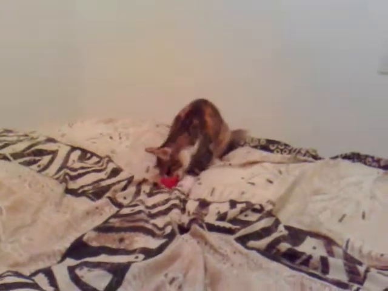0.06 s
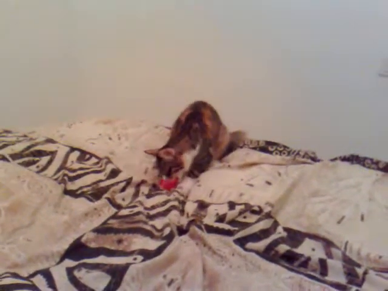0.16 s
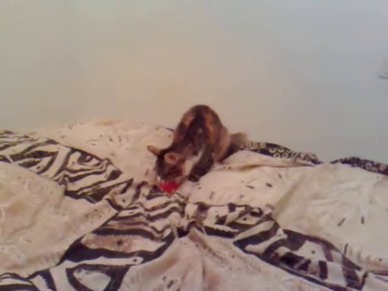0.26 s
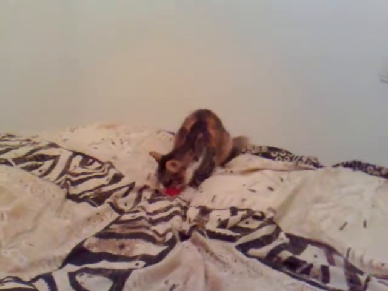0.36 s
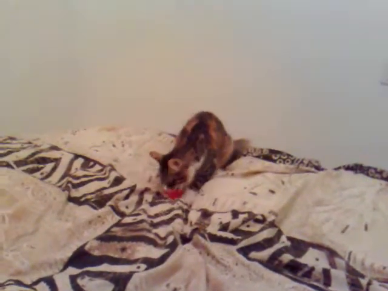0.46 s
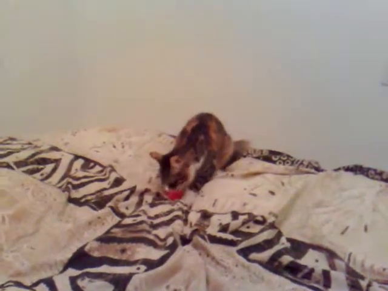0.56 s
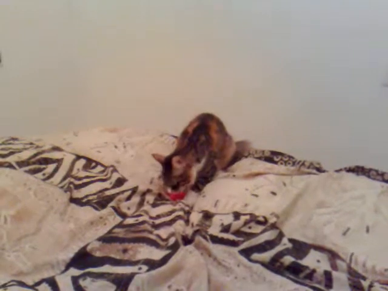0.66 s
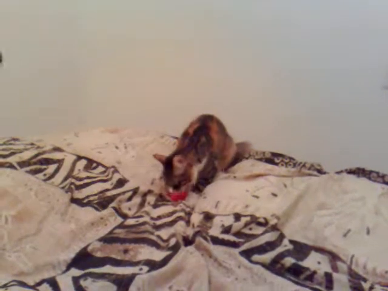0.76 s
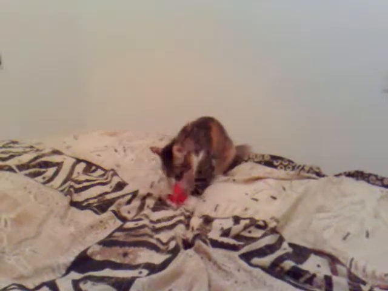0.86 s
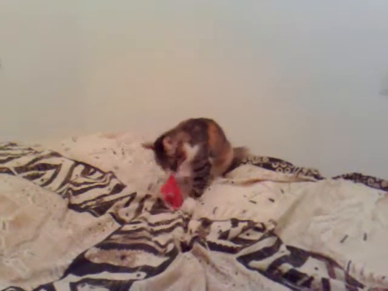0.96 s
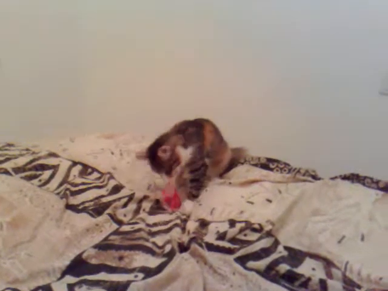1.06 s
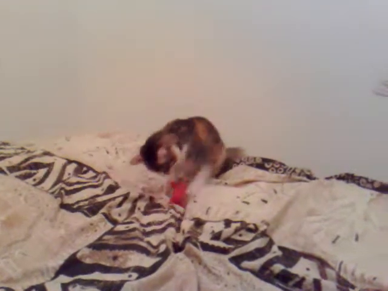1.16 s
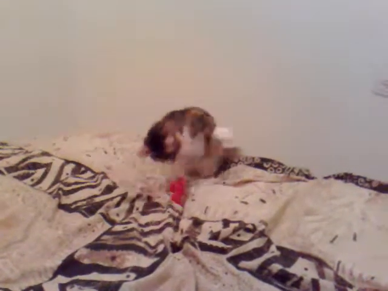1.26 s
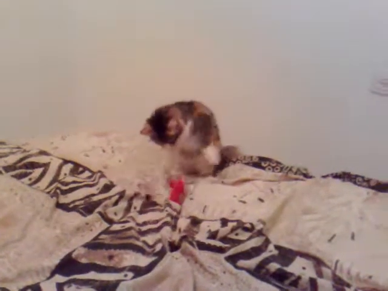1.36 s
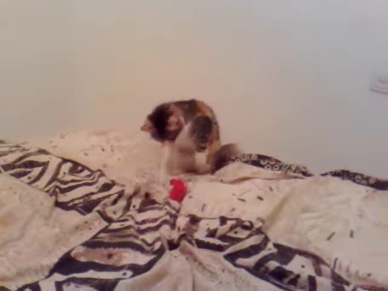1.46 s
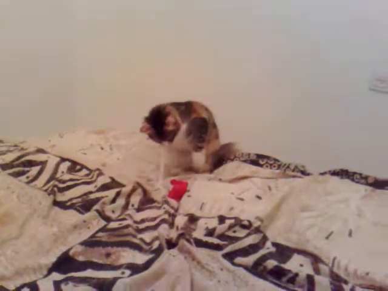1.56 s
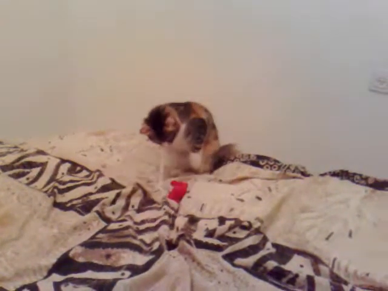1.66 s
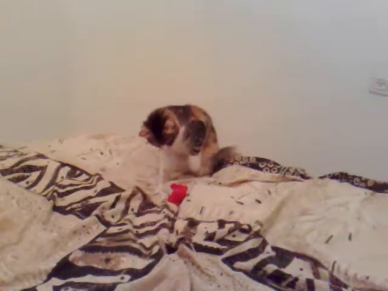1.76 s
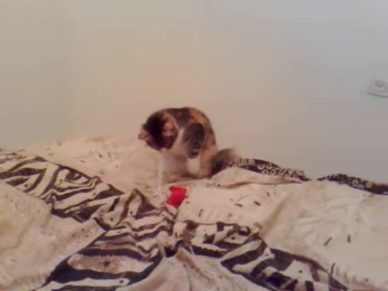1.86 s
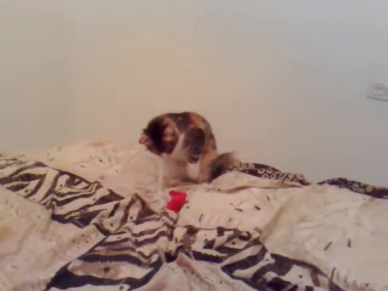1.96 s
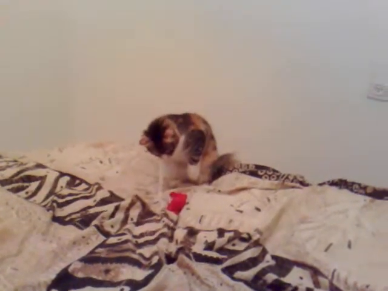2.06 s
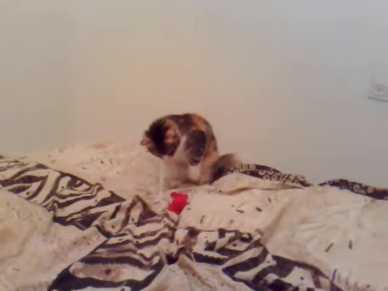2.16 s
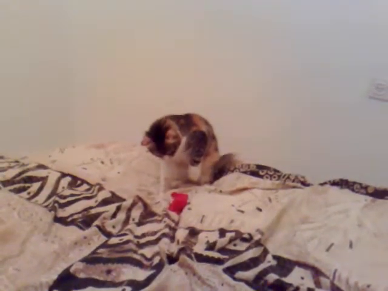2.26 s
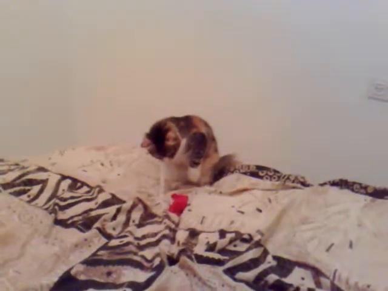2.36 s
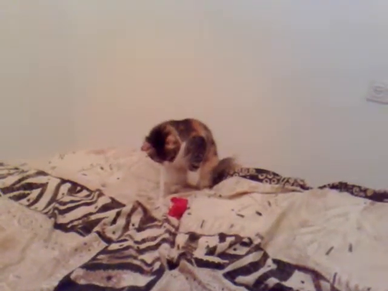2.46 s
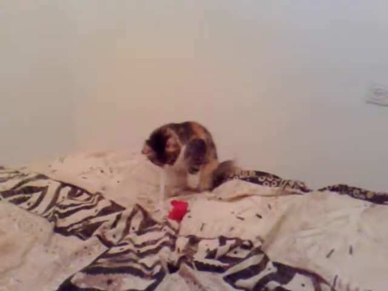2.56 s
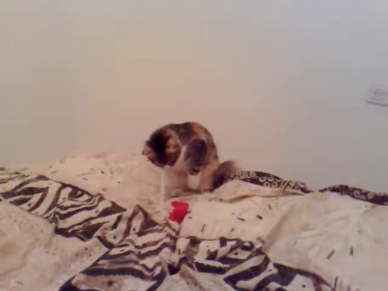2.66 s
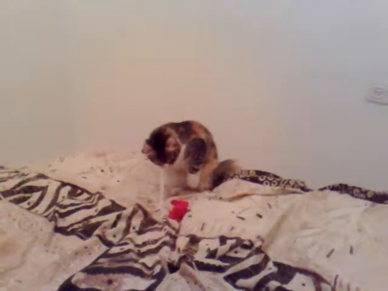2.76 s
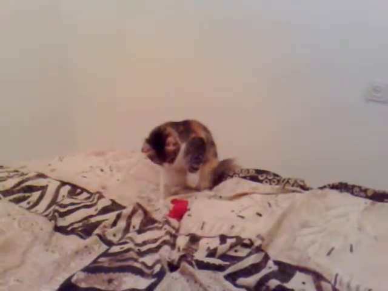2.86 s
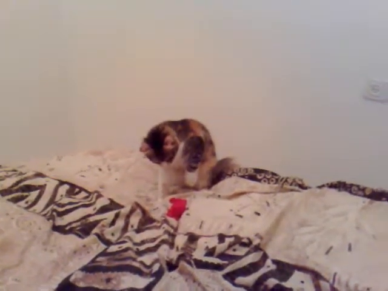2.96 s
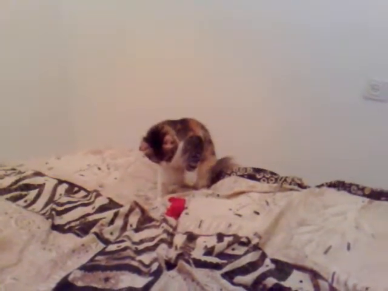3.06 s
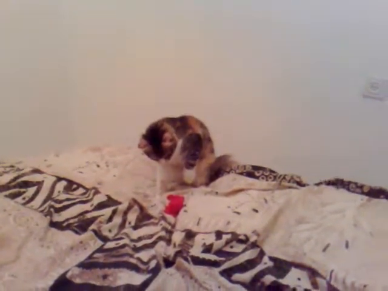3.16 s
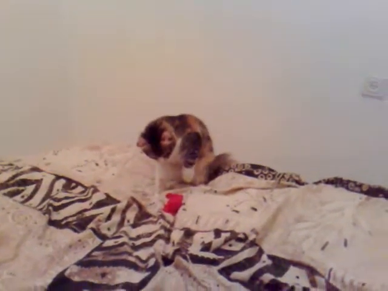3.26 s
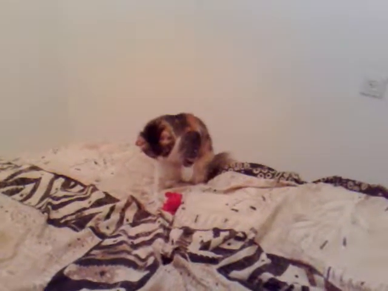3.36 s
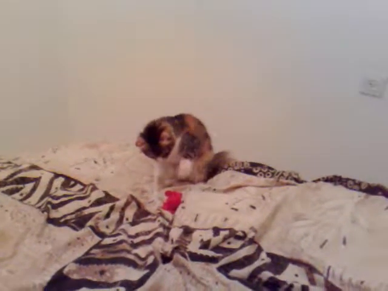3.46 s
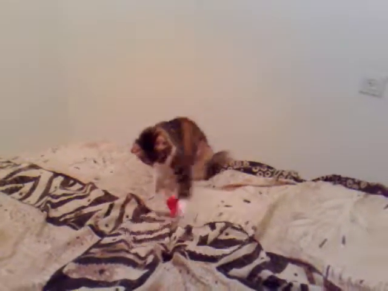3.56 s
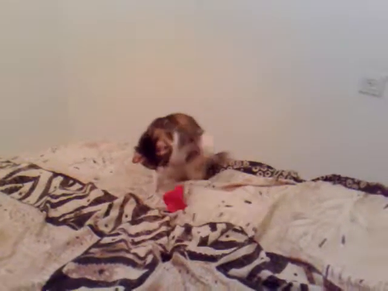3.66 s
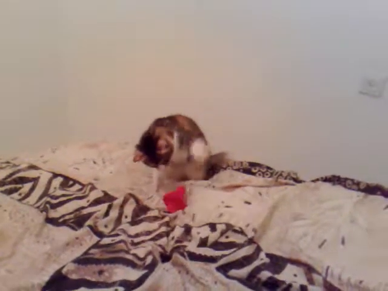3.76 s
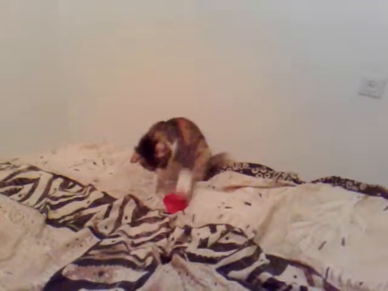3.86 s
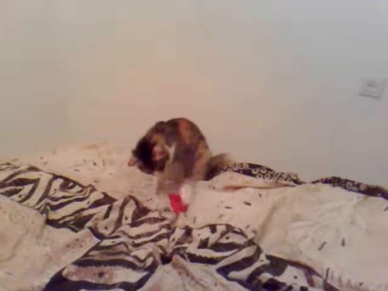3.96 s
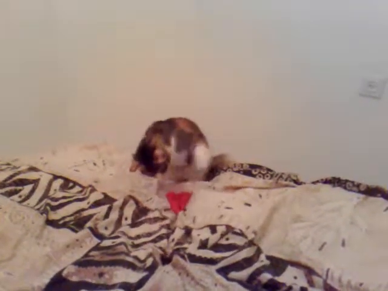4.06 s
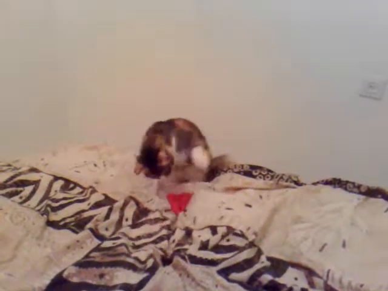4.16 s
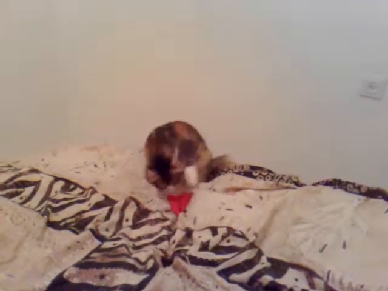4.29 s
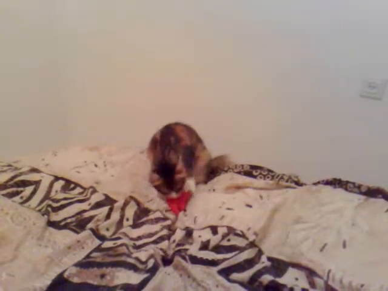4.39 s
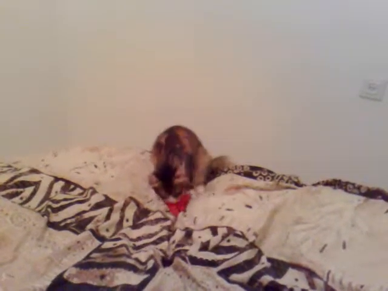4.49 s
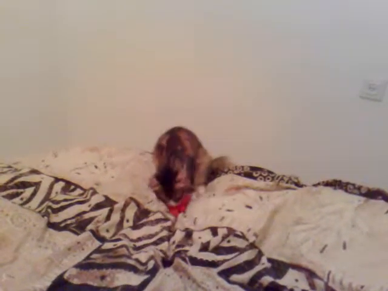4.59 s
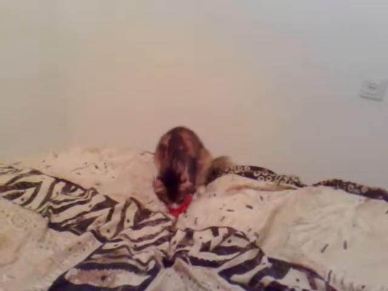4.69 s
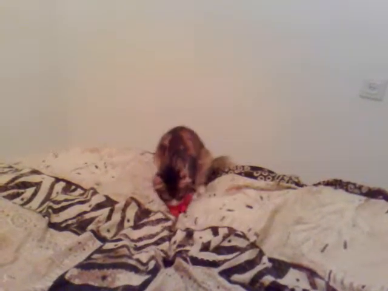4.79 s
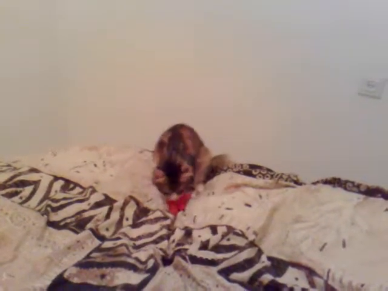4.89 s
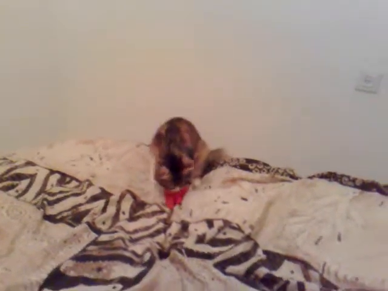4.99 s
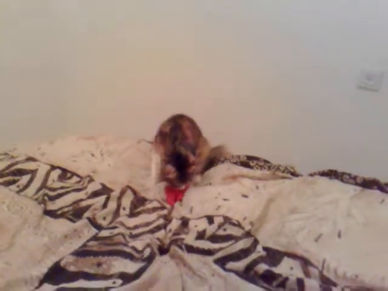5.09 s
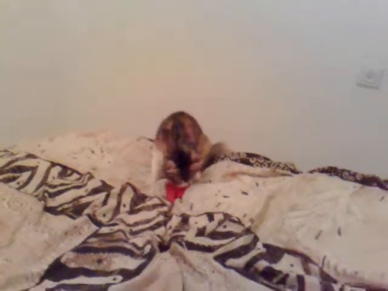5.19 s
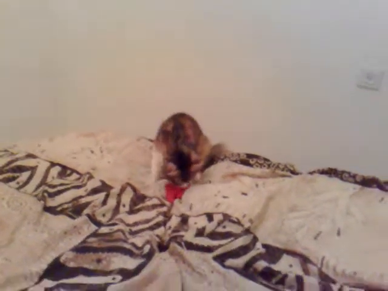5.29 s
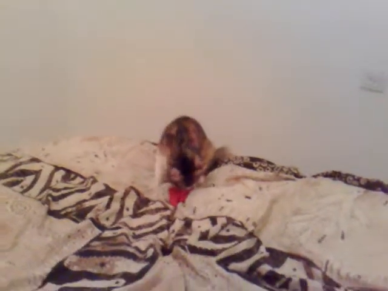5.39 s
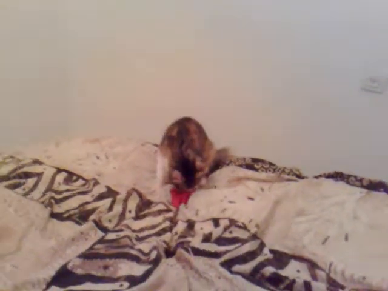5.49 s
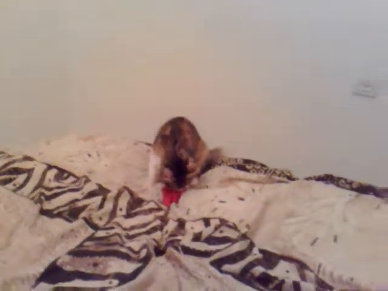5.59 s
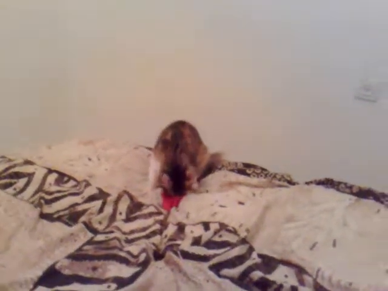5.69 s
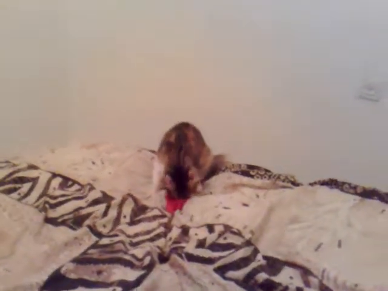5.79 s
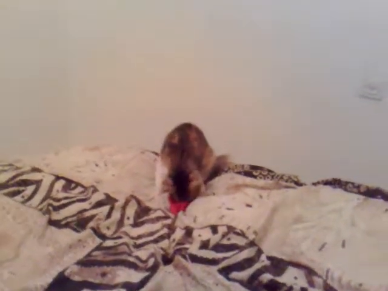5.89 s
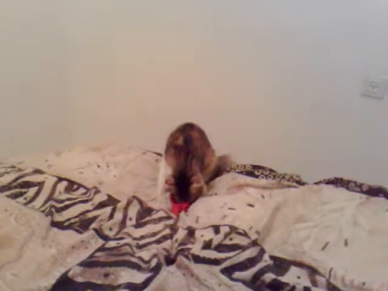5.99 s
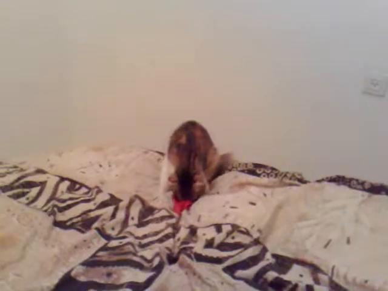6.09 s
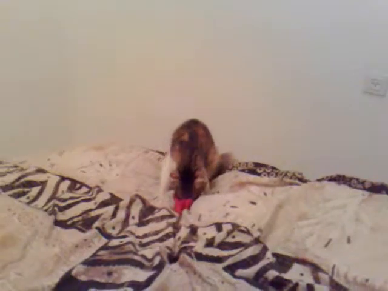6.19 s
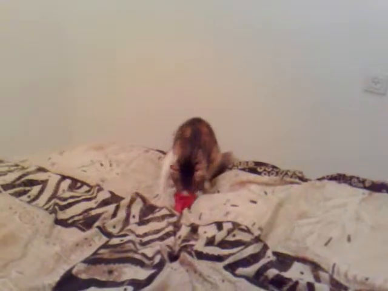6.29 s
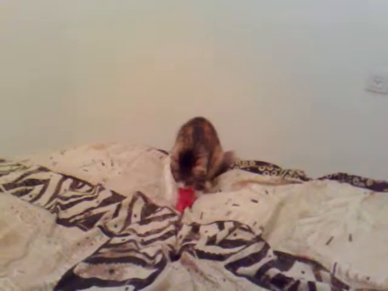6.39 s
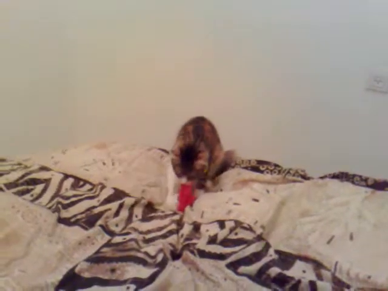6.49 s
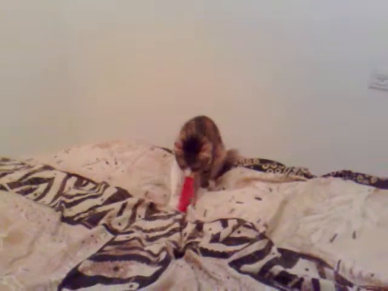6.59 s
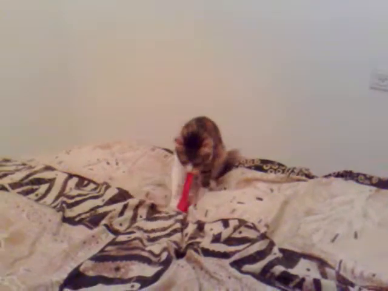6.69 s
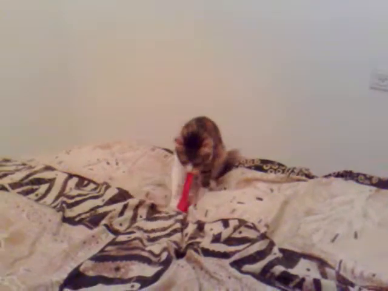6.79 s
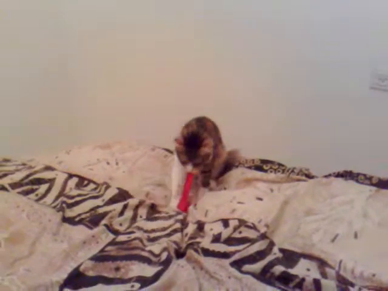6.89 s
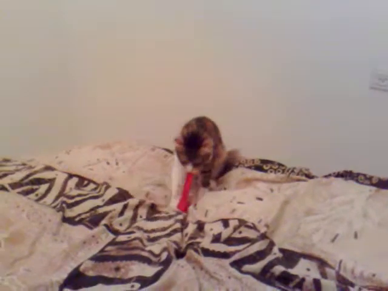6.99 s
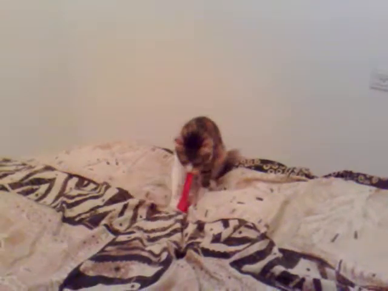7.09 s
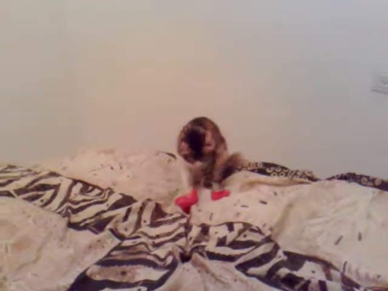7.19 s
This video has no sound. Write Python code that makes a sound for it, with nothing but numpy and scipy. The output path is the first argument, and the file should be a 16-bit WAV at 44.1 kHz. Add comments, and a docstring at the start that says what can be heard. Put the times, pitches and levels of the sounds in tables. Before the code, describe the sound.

Quiet small room with faint cloth rustle, a stretched-rubber snap, dull swats, and finally hard dry clicks as a cat bites a deflated balloon.

```python
"""In a small bare-walled room, a cat plays with a limp rubber balloon on a bedspread.
Stretched rubber snaps back and soft paws swat it: noise cracks, each followed by a decaying room tail.
Sharp, almost dry clicks of teeth and claws are short damped tones with a noise crack.
Bedding rustles as uneven filtered noise, over steady rumble, microphone hiss and a faint high whine."""
import sys
import numpy as np
from scipy import signal
from scipy.fft import rfft, irfft
from scipy.io import wavfile
from scipy.ndimage import uniform_filter1d

SR = 44100
rng = np.random.default_rng(int(sys.argv[2]) if len(sys.argv) > 2 else 0)


def bounce(signal):
    """Save signal as a 16-bit WAV file at the path given by the first command-line argument."""
    frames = np.transpose(np.atleast_2d(signal))
    limited = np.clip(frames, -1, 1)
    pcm = np.round(limited * 32767).astype(np.int16)
    wavfile.write(sys.argv[1], SR, pcm)


N = 319504


def from_db(db):
    """Turn decibels into a plain multiplier."""
    return 10 ** (np.asarray(db) / 20)


def rms_one(x):
    """Scale a signal to an average strength (rms) of 1."""
    return x / np.sqrt(np.mean(x ** 2) + 1e-20)


def at_hz(points, hz):
    """Read a table of levels between its points, on a log-frequency axis."""
    table_hz, table_db = np.array(points)[:, 0], np.array(points)[:, 1]
    return np.interp(np.log(hz), np.log(table_hz), table_db)


def bins(size):
    """Frequencies of a spectrum, kept above zero."""
    return np.maximum(np.fft.rfftfreq(size, 1 / SR), 1)


def noise(shape_db, size):
    """Noise of rms 1, coloured by a relative level at each frequency."""
    white = rfft(rng.standard_normal(size))
    return rms_one(irfft(white * from_db(shape_db), size))


def uneven(db, width, size):
    """A gain that wanders at random by this many dB (rms), smoothed over a width in samples."""
    wander = uniform_filter1d(rng.standard_normal(size), width)
    return from_db(db * rms_one(wander))


def fade(t, t60):
    """Exponential decay that falls by 60 dB in t60 seconds."""
    return np.exp(-np.log(1000) * t / t60)


def add(out, s, sound):
    """Mix a sound in at a time in seconds."""
    start = int(round(s * SR))
    out[start:start + len(sound)] += sound[:max(N - start, 0)]


def burst(shape_db, t60):
    """A brief noise crack, with its random energy evened so that equal settings are equally strong."""
    t = np.arange(SR) / SR
    envelope = fade(t, t60) * (1 - fade(t, t60 / 10))
    grain = noise(shape_db, SR) * envelope
    return 0.5 * grain * np.sqrt(np.sum(envelope ** 2) / np.sum(grain ** 2))


def sweep(x, lag_s):
    """Bending waves run slower at low pitch, so a crack becomes a quick downward chirp."""
    hz = bins(len(x))
    # lag_s sets the delay at 1 kHz; the highest frequency is not delayed
    delay_s = lag_s * (np.sqrt(1000 / hz) - np.sqrt(1000 / hz[-1]))
    phase = 2 * np.pi * np.cumsum(delay_s) * SR / len(x)
    return irfft(rfft(x) * np.exp(-1j * phase), len(x))


# how the room's echo dies away: (frequency [Hz], time to fall 60 dB [s])
ROOM_DECAY = [(100, 0.59), (300, 0.39), (700, 0.31), (2000, 0.41), (4400, 0.32), (6000, 0.26), (8000, 0.22),
              (15000, 0.22)]


def room_tail(shape_db):
    """One second of dense wall reflections; each pitch region dies at its own speed."""
    t, hz = np.arange(SR) / SR, bins(SR)
    spectrum, out = rfft(noise(shape_db, SR)), 0
    centres, t60s = np.transpose(ROOM_DECAY)
    for picked, t60 in zip(np.eye(len(ROOM_DECAY)), t60s):
        share = np.interp(np.log(hz), np.log(centres), picked)   # overlapping bands that add up to one
        out = out + irfft(spectrum * share, SR) * fade(t, t60)
    return out


# colour of the steady rumble and hiss: (frequency [Hz], relative level per Hz [dB])
RUMBLE_AND_HISS = [(12, -47.5), (20, -6.5), (26, -9.5), (53, 0), (101, -1.5), (270, -7.5), (485, -12.5),
                   (590, -14.5), (678, -16.5), (1570, -23), (2320, -24.5), (6720, -29.5), (11100, -28.5),
                   (12400, -25), (16000, -27.5)]
FLOOR_DB, WHINE_DB = -62, -79.5   # rms levels
WHINE_HZ, WHINE_HALF_WIDTH_HZ = 12560, 140


def background():
    """Room rumble and microphone hiss are coloured noise; an electronic whine is a narrow noise band."""
    hz = bins(N)
    whine = noise(-20 * np.log10(1 + ((hz - WHINE_HZ) / WHINE_HALF_WIDTH_HZ) ** 2), N)
    rumble_and_hiss = noise(at_hz(RUMBLE_AND_HISS, hz), N)
    return from_db(FLOOR_DB) * rumble_and_hiss + from_db(WHINE_DB) * whine


# bedding shifts, each swelling and fading: (time [s], level [dB], half length [s])
RUSTLES = [(0.253, -66.5, 0.023), (.6, -73, 0.24), (1.073, -70, 0.061), (1.736, -65.5, 0.1),
           (4.715, -63, 0.035), (5.502, -71, 0.22), (6.706, -56, 0.025), (6.78, -57.5, 0.067)]
# colour of rubbing cloth: (frequency [Hz], relative level per Hz [dB])
CLOTH = [(100, 6), (400, -1.5), (1500, -8), (3500, -13.5), (8000, -27.5), (16000, -26)]


def bedding(grain_db=2.5, grain_s=0.0048):
    """Cloth drags in small uneven catches as the cat shifts its weight."""
    t = np.arange(N) / SR
    motion = sum(from_db(db) * np.exp(-0.5 * ((t - s) / half) ** 2) for s, db, half in RUSTLES)
    catches = uneven(grain_db, int(grain_s * SR), N)
    cloth = noise(at_hz(CLOTH, bins(N)), N)
    return motion * rms_one(catches * cloth)


# colour of struck rubber: (frequency [Hz], relative level per Hz [dB])
RUBBER = [(30, -11), (90, 5), (220, -5), (420, 1), (950, -3.5), (1400, 0), (2300, -1), (3050, -1.5),
          (4200, 1), (5100, -5), (5900, 1.5), (8000, -5.5), (9700, -2.5), (16000, -5.5)]
# broad resonances that linger after a hard snap: (frequency [Hz], width [Hz], relative level [dB])
AFTER_RING = [(1790, 230, -3), (2460, 330, 0.5), (4140, 294, 3), (4600, 170, 0), (5560, 550, -2.5)]
HARD_SNAP_DB = -22   # level of a full-strength snap
# weaker blows lose crack and after-ring faster than level (dB lost per dB of level)
CRACK_GROWTH, AFTER_GROWTH = 1.02, 1.9
AFTER_DB, AFTER_T60_S = -27, 0.38   # after-ring of a full-strength snap, before it swells and fades
SNAP_T60_S = 0.012
CLUMP_DB = 1.5   # unevenness of a blow's tail


def blows(rows, rise_s, fall_db, lift_db, bed_db, crack_db, sweep_s):
    """Blows of one kind: a crack, then the room. The treble falls by fall_db an octave above the corner,
    the main resonance stands lift_db out, and the bed thumps about as hard whatever the level."""
    out, t, hz = np.zeros(N), np.arange(SR) / SR, bins(SR)
    lingering = sum(from_db(db) / (1 + ((hz - f) / width * 2) ** 2) for f, width, db in AFTER_RING)
    for s, level_db, corner_hz, main_hz in rows:
        force_db = level_db - HARD_SNAP_DB
        softness = fall_db * np.log2(1 + (hz / corner_hz) ** 4) / 4
        thump = (bed_db - level_db) / (1 + (hz / 200) ** 2)
        resonance = lift_db / (1 + (np.log2(hz / main_hz) / 0.18) ** 2)
        colour = at_hz(RUBBER, hz) - softness + thump + resonance

        after_ring = noise(20 * np.log10(lingering), SR) * fade(t, AFTER_T60_S)
        after_ring = from_db(AFTER_DB + AFTER_GROWTH * force_db) * after_ring
        tail = from_db(level_db) * room_tail(colour) + after_ring
        tail = tail * (1 - np.exp(-t / rise_s))

        # the harder the contact, the less bass in its crack
        thin = 20 * np.log10(1 + (0.6 * corner_hz / hz) ** 2)
        crack = burst(colour + resonance - thin, SNAP_T60_S)
        crack = from_db(crack_db + CRACK_GROWTH * force_db) * crack
        clumps = uneven(CLUMP_DB, 120, SR)   # reflections come in bunches
        add(out, s, sweep(tail * clumps + crack, sweep_s))
    return out


# stretched rubber slips and snaps back:
# (time [s], level [dB], treble corner [Hz], main resonance [Hz])
SNAPS = [(1.1395, -37.5, 2500, 1400), (1.3122, -23, 8000, 9220), (5.749, -53.5, 7500, 5150),
         (6.936, -34.5, 3200, 1580), (6.951, -35, 10000, 730)]


def snaps():
    """Taut rubber cracks at once; its treble falls off gently above the corner."""
    return blows(SNAPS, rise_s=0.003, fall_db=3.0, lift_db=5.5, bed_db=-33.0, crack_db=-7.5, sweep_s=0.001)


# a paw swats the balloon: (time [s], level [dB], treble corner [Hz], main resonance [Hz])
SWATS = [(3.760, -47.5, 950, 910), (3.771, -42, 2680, 990), (3.779, -43.5, 1800, 920),
         (4.154, -47, 2040, 404)]


def swats():
    """A soft paw lands dully; the bass comes a moment after the treble."""
    return blows(SWATS, rise_s=0.0013, fall_db=15, lift_db=10, bed_db=-41.5, crack_db=-11, sweep_s=0.0055)


def ring(t, hz, t60, glide=0):
    """A damped sine that swells in about half a cycle and sags in pitch as the tension goes."""
    t = np.maximum(t, 0)
    extra_s = glide * t60 / np.log(1000) * (1 - fade(t, t60))   # starts sharp by the fraction "glide"
    cycles = hz * (t + extra_s)
    return np.sin(2 * np.pi * cycles) * fade(t, t60) * (1 - np.exp(-2 * cycles))


def echo(x, reflections):
    """Pass a sound through reflections scaled to unit energy."""
    return signal.fftconvolve(x, reflections / np.linalg.norm(reflections))[:N]


# colour of a click's noisy edge, before tilting: (frequency [Hz], relative level per Hz [dB])
CRACK = [(150, -7.5), (900, -12.5), (1600, -2.5), (2600, -4), (4500, -1.5), (7000, -7.5), (9800, -4),
         (12000, -12), (16000, -14.5)]


def crack_colour(hz, tilt_db):
    """A harder contact tilts the crack towards the treble, by tilt_db an octave well above 700 Hz."""
    return at_hz(CRACK, hz) + tilt_db * np.log2(1 + hz / 700)


# teeth and claws click on the rubber; the last three levels are relative to the ping:
# (time [s], level [dB], ping pitch [Hz], crack [dB], knock [dB], thud [dB])
CLICKS = [(5.0725, -48.5, 4200, 2, -9, -22), (5.129, -51, 6570, 2, -15.5, -22),
          (5.277, -38, 1740, -1.5, -13, -16), (5.3272, -42.5, 3400, -4, -20, -24),
          (5.448, -43, 1590, -13, -9, -27), (5.7132, -28, 2670, -8.5, -7, -38),
          (5.739, -26.5, 2350, -1.5, -11, -1.5), (5.749, -40.5, 1400, -4, 1, 2.5),
          (6.1338, -9.5, 7050, -8.5, -19, -18), (6.2153, -40.5, 1820, -4, -8, -7),
          (6.6081, -16.5, 4020, -14.5, -22, -36), (6.744, -33, 4860, 3, -15, -0.5),
          (6.7556, -3.5, 6770, -1.5, -8, -16), (6.7759, -23, 3500, -7.5, -26, -21),
          (6.9014, -8.5, 6600, 0.5, -19, -47), (6.9067, -4, 3780, 2, -17, -23.5),
          (6.908, -7.5, 1900, -8, -26, -30), (7, -17, 2000, -11, -22, -17),
          (7.034, -22.5, 5300, -8, -23, -33.5), (7.1918, -1.5, 6540, -9.5, -45, -52)]
# tones of a click's ping: (multiple of its pitch [-], level [dB], time to fall 60 dB [s])
PING_MODES = [(1, 0, .0029), (.64, -20, 0.008)]
PING_GLIDE = 0.025   # starting sharpness, as a fraction of the pitch
KNOCK_HZ, KNOCK_LAG_S, KNOCK_CYCLES = 1280, 0.00066, 15.6   # cycles to fall 60 dB
THUD_HZ, THUD_LAG_S, THUD_T60_S = 142, 0.00234, 0.015
HOLLOW_HZ, HOLLOW_DB, HOLLOW_T60_S = 470, 10, 0.0049   # the thud's upper tone
CRACK_T60_S, CLICK_SWEEP_S = 0.011, 0.000842
# crack tilt in dB an octave: for a 4 kHz, 0 dB ping; added per octave of pitch; added per dB; lowest
TILT_DB, TILT_PER_OCTAVE, TILT_PER_DB, DULLEST_TILT_DB = 2.0, 5.6, 0.43, -9.5
CLICK_ROOM_DB, CLICK_NEAR_DB, NEAR_T60_S = -40, -24, 0.11


def clicks():
    """Each direct click lasts milliseconds: ping and crack, then knock and thud, with a trace of room."""
    rings, cracks, t, hz = np.zeros(N), np.zeros(N), np.arange(SR) / SR, bins(SR)
    knock = ring(t - KNOCK_LAG_S, KNOCK_HZ, KNOCK_CYCLES / KNOCK_HZ, PING_GLIDE)
    hollow = ring(t - THUD_LAG_S, HOLLOW_HZ, HOLLOW_T60_S)
    thud = ring(t - THUD_LAG_S, THUD_HZ, THUD_T60_S) + from_db(HOLLOW_DB) * hollow
    for s, level_db, ping_hz, crack_db, knock_db, thud_db in CLICKS:
        ping = sum(from_db(db) * ring(t, multiple * ping_hz, t60, PING_GLIDE)
                   for multiple, db, t60 in PING_MODES)
        tones = ping + from_db(knock_db) * knock + from_db(thud_db) * thud
        add(rings, s, from_db(level_db) * tones)

        # higher and louder clicks have brighter cracks
        tilt_db = TILT_DB + TILT_PER_OCTAVE * np.log2(ping_hz / 4000) + TILT_PER_DB * level_db
        crack = burst(crack_colour(hz, max(tilt_db, DULLEST_TILT_DB)), CRACK_T60_S)
        add(cracks, s, sweep(from_db(level_db + crack_db) * crack, CLICK_SWEEP_S))
    direct = rings + cracks
    walls = room_tail(np.zeros_like(hz))
    nearby = noise(np.zeros_like(hz), SR) * fade(t, NEAR_T60_S)   # small things close by scatter the cracks
    room = from_db(CLICK_ROOM_DB) * echo(direct, walls)
    return direct + room + from_db(CLICK_NEAR_DB) * echo(cracks, nearby)


def scene():
    """Everything as heard at one microphone."""
    return (background() + snaps() + swats() + clicks() + bedding())[None]


def record(dry):
    """A steep low-pass filter cuts the top above 16.1 kHz."""
    low_pass = signal.ellip(10, 0.2, 70, 16100, fs=SR, output="sos")
    return signal.sosfilt(low_pass, dry)


dry = scene()
out = record(dry)
bounce(out)
```